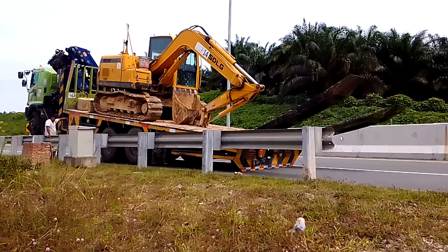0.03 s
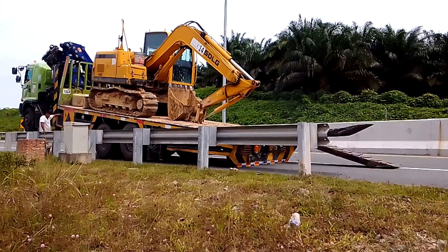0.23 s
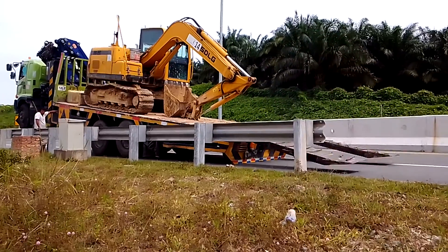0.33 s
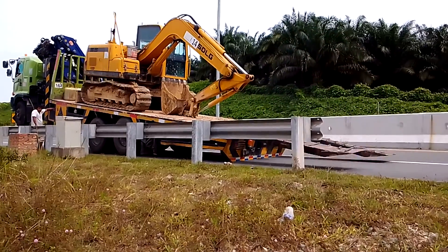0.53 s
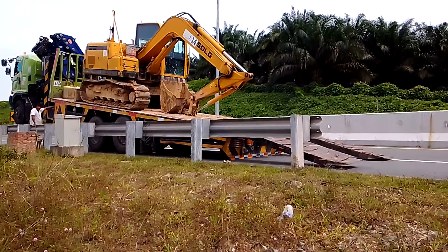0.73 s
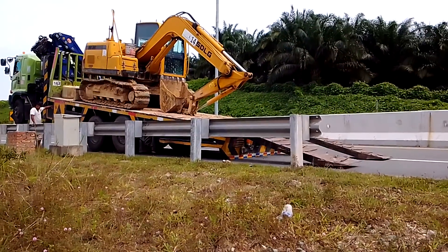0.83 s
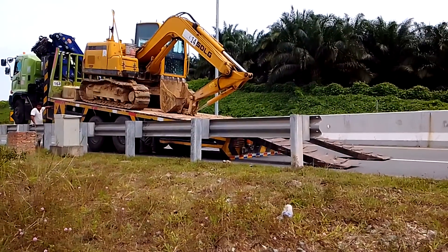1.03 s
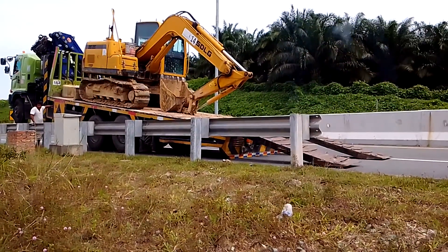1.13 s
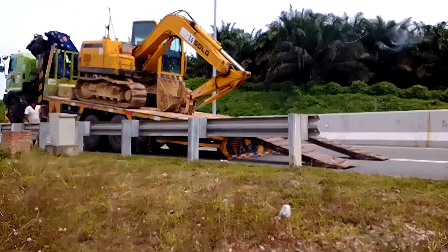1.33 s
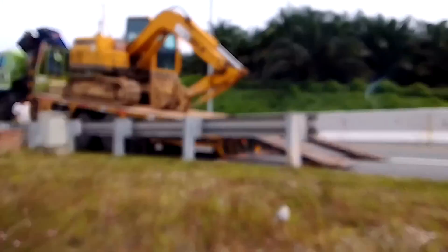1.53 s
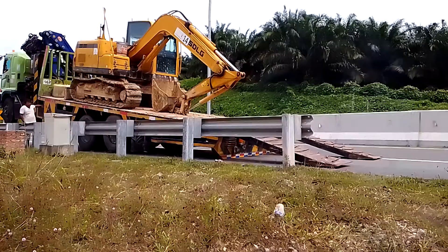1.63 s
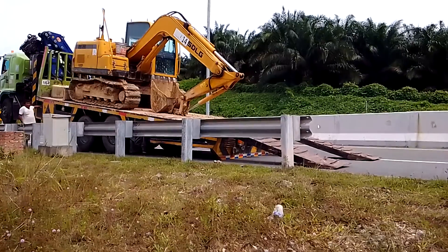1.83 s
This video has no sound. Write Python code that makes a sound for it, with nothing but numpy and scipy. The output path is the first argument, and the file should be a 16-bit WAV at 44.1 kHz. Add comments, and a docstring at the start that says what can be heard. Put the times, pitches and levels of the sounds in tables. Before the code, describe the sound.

Heavy steel ramps crash onto a road and bounce, clattering over an idling diesel truck.

```python
"""A diesel idles throughout, its firings modulating a low knock and a clatter.
A hinge groans by stick-slip friction as two heavy steel loading ramps swing down from a truck.
From 0.2 s they hit the road and bounce: each blow sets loose parts chattering, and the contacts excite
the modes of the steel and echo along the roadside. Dull, low thumps come with the loudest crashes.
By 1.7 s the ramps settle and the engine grows quieter. A dull microphone rounds the loudest peaks."""
import sys
import numpy as np
from scipy import signal
from scipy.fft import rfft, irfft
from scipy.io import wavfile
from scipy.ndimage import uniform_filter1d

SR = 44100
rng = np.random.default_rng(int(sys.argv[2]) if len(sys.argv) > 2 else 0)


def materialize(psi):
    """Save the field psi as 16-bit PCM at rate SR to the path in sys.argv[1].

    A 1-D psi becomes a single channel; in a 2-D psi each row is a channel.
    """
    bounded = np.clip(np.atleast_2d(psi).T, -1, 1)
    quanta = np.round(bounded * 32767).astype(np.int16)
    wavfile.write(sys.argv[1], SR, quanta)


N = 83790


def undb(db):
    """Amplitude ratio of a level in decibels."""
    return 10 ** (np.asarray(db) / 20)


def unit(x):
    """Normalisation to rms 1."""
    return x / np.sqrt(np.mean(x ** 2) + 1e-18)


def fade(t, t60):
    """Exponential decay from time zero: 60 dB in t60 seconds (at least 1 ms)."""
    return np.exp(-np.log(1000) * np.maximum(t, 0) / max(t60, 1e-3))


def ring(x, response):
    """Convolution with the impulse response of a linear system."""
    return signal.fftconvolve(x, response)[:N]


def colour(points, size=4096):
    """Minimum-phase impulse response of a spectrum of (f/Hz, level/dB) points."""
    hz, db = np.array(points).T
    f = np.maximum(np.arange(size // 2 + 1) * SR / size, 1)
    magnitude = undb(np.interp(np.log(f), np.log(hz), db))
    cepstrum = irfft(np.log(magnitude))
    cepstrum[1:size // 2] *= 2
    cepstrum[size // 2 + 1:] = 0
    return irfft(np.exp(rfft(cepstrum)))


def split(x, hz, order=7):
    """Crossover filter: the parts of a sound below and above a frequency."""
    return [signal.sosfilt(signal.butter(order, hz, kind, fs=SR, output="sos"), x)
            for kind in ("low", "high")]


def wander(size):
    """Random drift of rms 1: a moving average of noise over size samples."""
    return unit(uniform_filter1d(rng.standard_normal(N), size=size))


def steady(x, size=900):
    """Division by the running rms evens out the swells of a noise."""
    return x / np.sqrt(np.abs(uniform_filter1d(x ** 2, size=size)) + 1e-18)


# spectral envelope of the engine: f/Hz, relative level/dB
ENGINE_SPECTRUM = [(30, -55), (60, -27.5), (160, -16), (220, -3), (320, 2), (520, -7.5), (900, -13.5),
                   (1600, -17.5), (2300, -11.5), (2900, -18), (4300, -22.5), (5200, -49.5), (7000, -55.5),
                   (15000, -63.5)]
# course of the engine's two bands: t/s, knock level/dB, clatter level/dB
ENGINE_LEVELS = [(0, -38, -39), (0.197, -34.5, -39.5), (0.459, -34.5, -38), (1.45, -39, -40.5),
                 (1.65, -45, -45), (1.76, -50, -50.5)]
# narrow resonances of the machinery: f/Hz, bandwidth/Hz, level/dB
WHINES = [(1894, 110, -54.5), (2178, 140, -55), (3970, 230, -59.5)]

def diesel(t, firing_hz=50.4, knock_depth=0.2, clatter_depth=0.13):
    """Amplitude modulation: each firing swells knock and clatter; machine resonances whine faintly."""
    firing_rate = firing_hz * (1 + 0.054 * wander(size=4000))
    firing = np.cos(2 * np.pi * np.cumsum(firing_rate) / SR)
    times, *levels = np.array(ENGINE_LEVELS).T
    bands = split(ring(rng.standard_normal(N), colour(ENGINE_SPECTRUM)), hz=584)
    engine = sum(unit(band * (1 + depth * firing)) * undb(np.interp(t, times, db))
                 for band, depth, db in zip(bands, (knock_depth, clatter_depth), levels))
    for hz, width, db in WHINES:
        resonance = signal.butter(2, [hz - width / 2, hz + width / 2], "band", fs=SR, output="sos")
        engine += undb(db) * unit(signal.sosfilt(resonance, rng.standard_normal(N)))
    return engine


# groans of the hinge: t/s, duration/s, f/Hz, level/dB
GROANS = [(0.139, .026, 554.7, -26.5), (0.159, 0.044, 555.7, -29)]

def hinge(t, harmonics_db=(4, -5, -10.5), jitter=0.067, roughness=0.41):
    """Stick-slip friction: a harmonic oscillation, irregular in frequency and amplitude."""
    out = 0
    for start, length, hz, db in GROANS:
        phase = 2 * np.pi * np.cumsum(hz * (1 + jitter * wander(size=60))) / SR
        tone = sum(undb(level) * np.sin(k * phase) for k, level in enumerate(harmonics_db, 1))
        tone *= 1 + roughness * wander(size=90)
        swell = np.sin(np.pi * np.clip((t - start) / length, 0, 1))
        out += undb(db) * unit(tone) * swell
    return out


# spectrum of a steel contact, dull above 4.5 kHz: f/Hz, relative level/dB
CONTACT_SPECTRUM = [(100, -52), (156, -28), (228, -6), (310, -1.5), (457, 4), (519, -9), (627, -6),
                    (791, -7.5), (898, -13), (1130, -7.5), (1370, -10.5), (1550, -7), (1800, -7),
                    (2000, -13.5), (2320, -7.5), (2750, -13.5), (2990, -10), (3390, -12.5), (3690, -11),
                    (4190, -15), (5280, -38), (8580, -38.5), (9950, -44), (15500, -52)]
# blows of the ramps: t/s, attack/s, hold/s, T60/s, then level/dB of boom, clank, clash and sizzle
BLOWS = [(0.216, 0.0069, 0.15, 1.2, -20, -24.5, -29, -59.5),
         (0.271, 0.0071, 0.026, 0.53, -27, -16.5, -16.5, -44),
         (0.35, 0.003, 0.019, 0.13, -24, -18.5, -14.5, -39),
         (0.384, 0.002, 0.074, 0.9, -16.5, -21, -36, -51.5),
         (0.478, 0.0006, 0.03, 0.26, -13.5, -10, -8, -22),
         (0.5946, 0.0004, 0.0054, 0.5, -12.5, -11.5, -15, -32.5),
         (0.61, 0.0041, 0.01, 0.51, -26, -21, -14, -27.5),
         (0.676, 0.0087, 0.088, 0.17, -18, -15, -17.5, -39),
         (0.825, 0.0035, 0.0038, 0.5, -20, -15, -15.5, -31.5),
         (0.841, 0.0038, 0.061, 0.4357, -19.5, -17.5, -16, -30),
         (0.891, 0.0034, 0.039, 0.0445, -13.5, -12.5, -17.5, -40),
         (0.906, 0.0012, 0.012, 0.28, -25, -27, -20, -26),
         (0.931, 0.0028, 0.017, 0.1732, -12, -10, -14, -34),
         (0.992, 0.0069, 0.04, 0.4, -15.5, -16.5, -16, -35), (1.025, .003, 0.027, 0.21, -13, -13, -15, -30),
         (1.074, 0.0045, 0.014, 0.42, -14.5, -22.5, -22.5, -58),
         (1.29, 0.003, 0.0088, -0.13, -19, -25.5, -51.5, -70),
         (1.31, 0.001, 0.0097, 0.19, -25.5, -22, -29, -58),
         (1.328, .003, 0.05, 0.12, -28, -38, -38.5, -61.5),
         (1.617, 0.003, 0.027, 0.9, -32, -39.5, -64, -73)]

def chatter(t, contacts_per_s=3200, spread_db=1, strike_db=-13.5, strike_t60_s=0.018):
    """Shot noise: each blow sets loose plates and hinges colliding; the blows add in power."""
    crossovers_hz, t60_shares = (471, 1287, 4990), (0.98, 1, 0.91, 1)  # boom to sizzle
    sizes = undb(spread_db * np.clip(rng.standard_normal(N), -2, 2))
    signs = rng.choice([-1, 1], N)
    touches = rng.random(N) < contacts_per_s / SR
    treble = ring(sizes * signs * touches, colour(CONTACT_SPECTRUM))
    bands = []
    for hz in crossovers_hz:
        low, treble = split(treble, hz)
        bands.append(low)
    bands.append(treble)
    power = np.zeros((4, N))
    for start, rise, hold, t60, *db in BLOWS:
        age = t - start
        strike = 1 + undb(strike_db) * fade(age, strike_t60_s)  # the first contact stands out
        attack = np.clip(age / rise, 0, 1) * strike
        for k, share in enumerate(t60_shares):
            power[k] += (undb(db[k]) * attack * fade(age - hold, share * t60)) ** 2
    return sum(steady(band) * np.sqrt(p) for band, p in zip(bands, power))


# strong modes of the ramps: f/Hz, relative level/dB
RAMP_MODES = [(292.5, -28), (623, -38), (1124, -44), (2523, -46), (2902, -38.5), (2973, -34), (3667, -32)]

def ramp_modes(t, contacts, t60_s=0.075, gain_db=-9):
    """Modal resonance: each mode is a damped oscillator that rings on after every contact."""
    return sum(undb(db + gain_db) * unit(ring(contacts, np.cos(2 * np.pi * hz * t) * fade(t, t60_s)))
               for hz, db in RAMP_MODES)


def plates(t, contacts, groups=6, modes_per_group=30, t60_s=0.21, relative_db=-9.5):
    """Modal excitation: which group of plate modes responds shifts as the point of contact moves."""
    age = t[:SR // 4]
    lowest_hz, span_hz = 400, 4500
    out = 0
    for _ in range(groups):
        modes = sum(np.sin(2 * np.pi * ((lowest_hz + span_hz * place) * age + phase))
                    for place, phase in rng.random((modes_per_group, 2)))
        coupling = wander(size=3000)
        out += ring(contacts * coupling, modes * fade(age, t60_s))
    return undb(relative_db) * np.std(contacts) * unit(out)


def roadside(t, source, t60_s=0.94, build_up_s=0.0043, top_hz=4900, relative_db=-13):
    """Scattering and absorption: barriers and trees return a diffuse echo; the trees absorb treble."""
    scatter = split(rng.standard_normal(N), top_hz, order=3)[0]
    tail = scatter * fade(t, t60_s) * np.minimum(t / build_up_s, 1)
    return undb(relative_db) * np.std(source) * unit(ring(source, tail))


# contacts that make one plate or pin sing out: t/s, f/Hz, level/dB
PINGS = [(.222, 280, -21.5), (0.283, 1573, -21.5), (0.352, 4620, -31), (.404, 293, -18.5),
         (0.479, 697, -19.5), (.48, 2570, -19), (0.593, 251.5, -18.5), (0.596, 1125, -21.5),
         (0.722, 367, -16), (0.878, 312.1, -17), (0.925, 294.5, -18.5), (.927, 766, -17.5),
         (0.936, 617.3, -18), (1.025, 2943, -18.5), (1.028, 297, -24.5), (1.306, 325, -28)]

def pings(t, attack_s=0.0053, t60_s=0.22, wobble_hz=13.1):
    """Damped free vibration: single plates and pins ring, wavering in pitch as they shake."""
    out = 0
    for start, hz, db in PINGS:
        phase = 2 * np.pi * np.cumsum(hz + wobble_hz * wander(size=200)) / SR
        envelope = np.clip((t - start) / attack_s, 0, 1) * fade(t - start, t60_s)
        out += undb(db) * unit(np.sin(phase)) * envelope
    return out


# brief dips in level: t/s, duration/s, level change/dB
DIPS = [(0.436, .0425, -15.5), (0.796, 0.037, -8)]

def dips(t, fall_s=0.0099, recover_s=0.0019):
    """Time-varying gain: the level dips briefly between the crashes and returns abruptly."""
    db = 0
    for start, length, depth in DIPS:
        falling = (t - start) / fall_s
        recovering = (start + length - t) / recover_s
        db += depth * np.clip(np.minimum(falling, recovering) + 0.5, 0, 1)
    return undb(db)


# dull, low thumps: t/s, level/dB
THUMPS = [(.481, -54), (0.607, -50), (.925, -54)]

def low_thumps(t, attack_s=0.004, t60_s=0.24, top_hz=70):
    """Exponentially decaying low-pass noise: brief, dull thumps that come with the loudest crashes."""
    envelope = sum(undb(db) * np.clip((t - start) / attack_s, 0, 1) * fade(t - start, t60_s)
                   for start, db in THUMPS)
    rumble = split(rng.standard_normal(N), top_hz, order=2)[0]
    return envelope * steady(rumble)


def scene():
    """Superposition: engine, hinge, ramps, echo and thumps add in one channel."""
    t = np.arange(N) / SR
    contacts = chatter(t)
    ramps = undb(-3) * contacts + ramp_modes(t, contacts) + plates(t, contacts) + pings(t) + hinge(t)
    dip_gain = dips(t)
    steel = (ramps + roadside(t, ramps)) * dip_gain
    steel = split(steel, hz=183, order=3)[1]  # high-pass: keeps the clatter and its dips free of rumble
    mix = steel + low_thumps(t) + diesel(t) * dip_gain ** 0.5  # the engine dips half as many dB
    return mix[None]


def record(dry, hiss_db=-84.5, ceiling=0.72, top_hz=15900):
    """Self-noise, saturation and band limiting: the microphone hisses, rounds peaks and cuts the top."""
    noisy = dry + undb(hiss_db) * rng.standard_normal(N)
    rounded = noisy / (1 + (noisy / ceiling) ** 8) ** (1 / 8)
    low_pass = signal.ellip(10, 0.2, 80, top_hz, fs=SR, output="sos")
    return signal.sosfilt(low_pass, rounded)


dry = scene()
out = record(dry)
materialize(out)
```